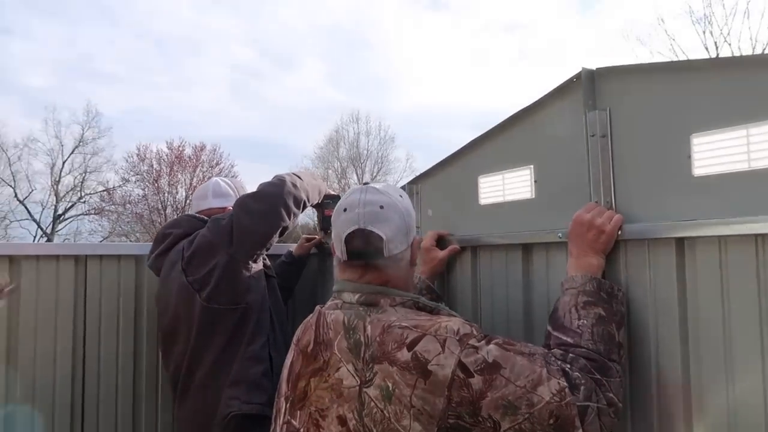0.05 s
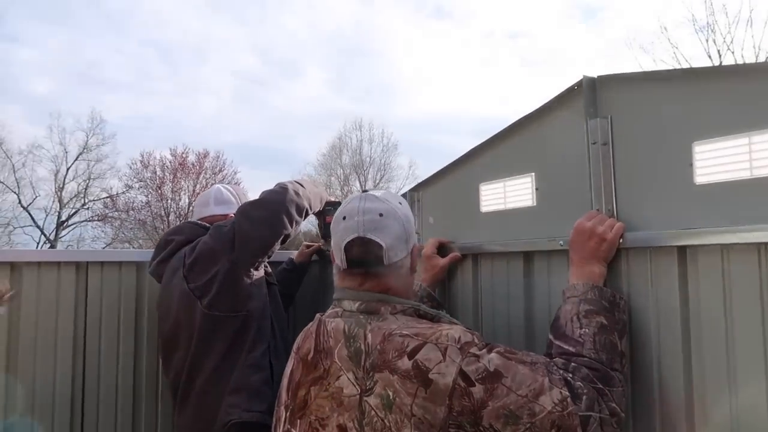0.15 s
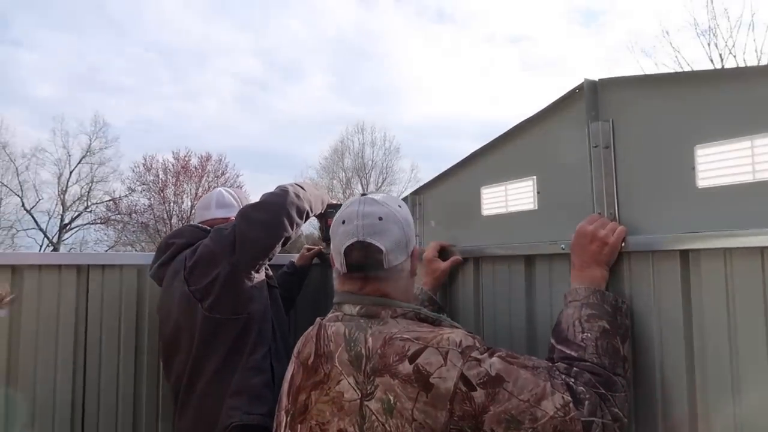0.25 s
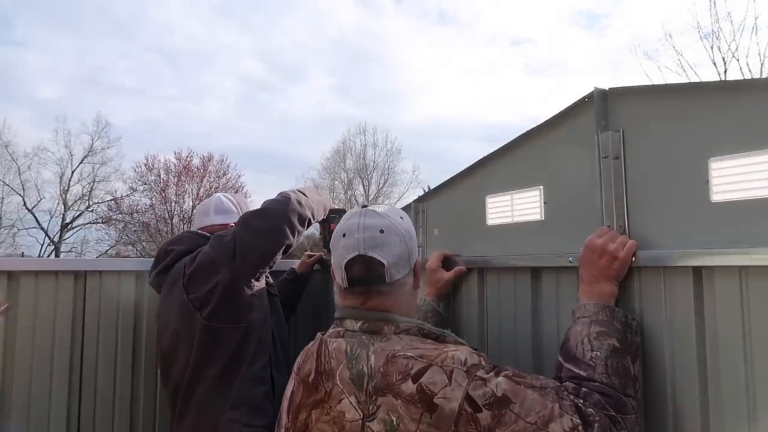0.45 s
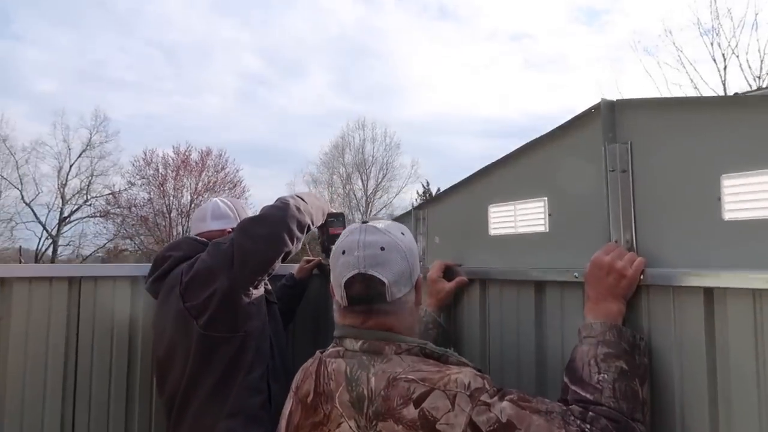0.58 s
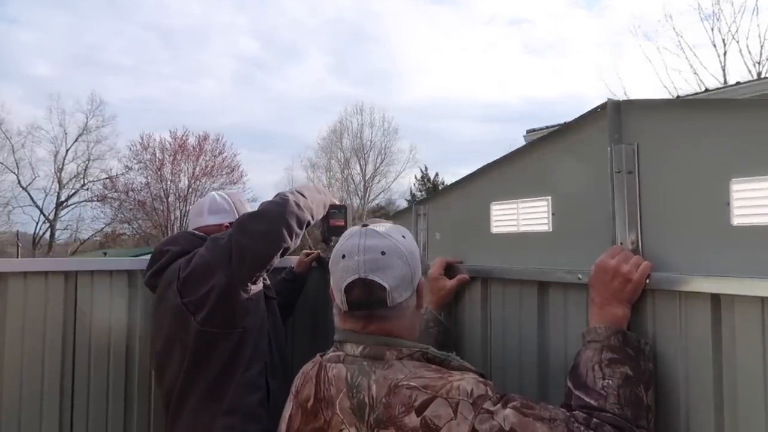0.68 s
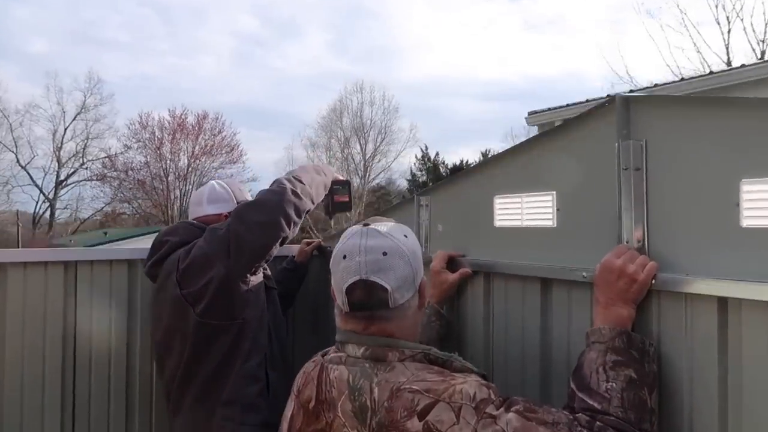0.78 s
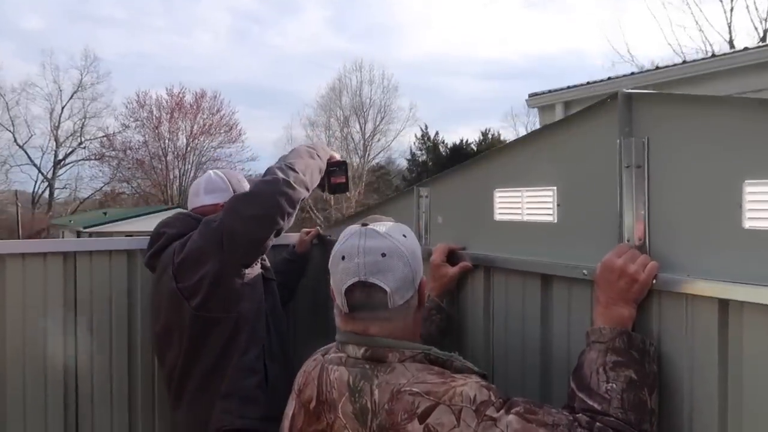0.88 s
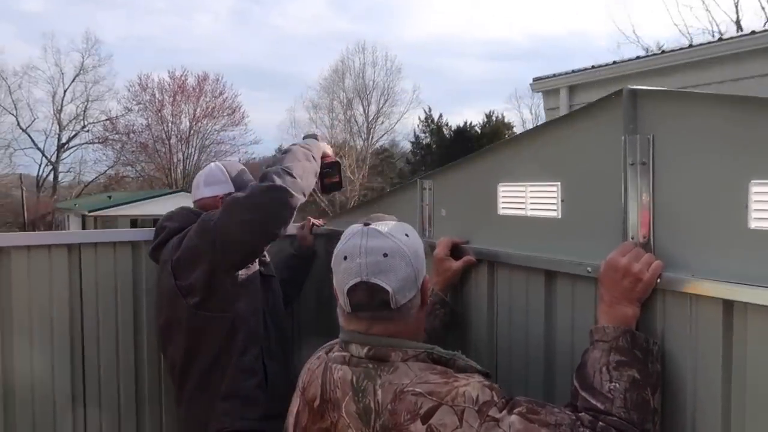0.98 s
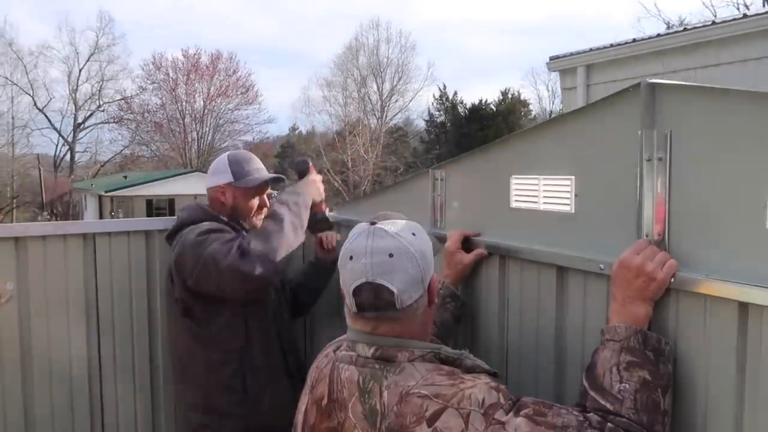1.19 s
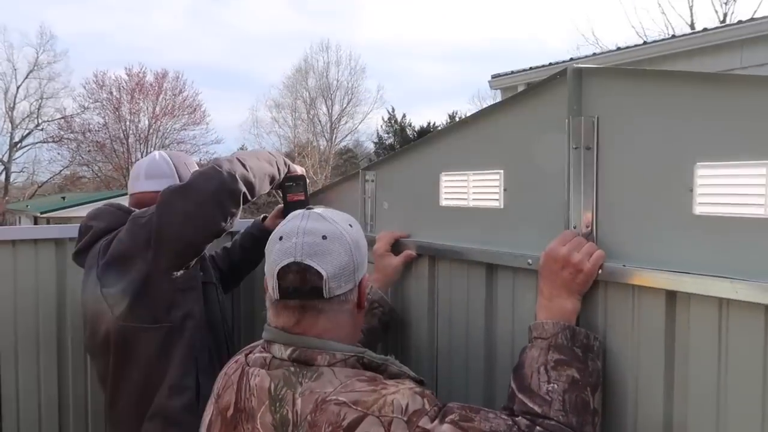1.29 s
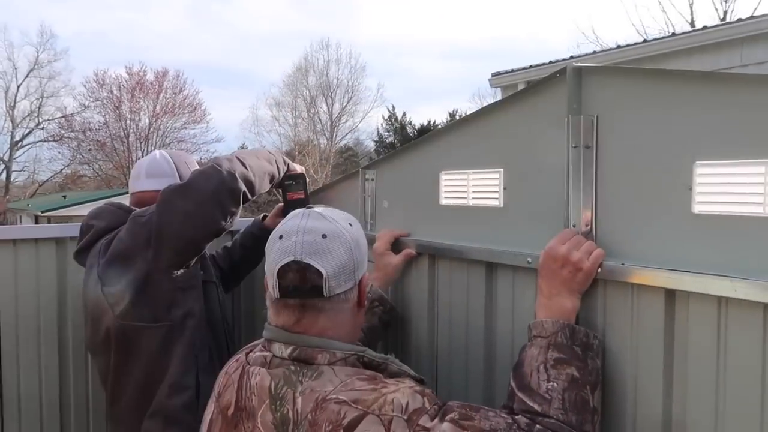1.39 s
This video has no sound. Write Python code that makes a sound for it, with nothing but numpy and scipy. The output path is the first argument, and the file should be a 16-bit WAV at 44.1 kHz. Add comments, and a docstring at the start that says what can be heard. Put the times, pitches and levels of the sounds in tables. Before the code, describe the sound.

A thin metal shed panel scrapes, then drops into place with a clattering, booming bang.

```python
"""A thin steel gable panel is shoved along a garden shed's wall, outdoors, an arm's length away.
Its edge scrapes and squeaks while the sheet bows and hums. At 0.3 s it drops into place with a
clattering bang; the walls boom on, loose overlaps chatter and a few light knocks follow.
Near the end the panel slides again with a thin hiss, and a gust brushes the microphone.
A steady low outdoor rumble with faint air lies underneath it all."""
import sys
import numpy as np
from scipy import signal
from scipy.io import wavfile

SR = 44100
rng = np.random.default_rng(int(sys.argv[2]) if len(sys.argv) > 2 else 0)


def log_audio(samples):
    """Write samples as a 16-bit WAV file to the path given in sys.argv[1]."""
    # one column per channel
    frames = np.atleast_2d(samples).T
    # limit to full scale, then quantise
    limited = np.clip(frames, -1, 1)
    pcm = np.round(limited * 32767).astype(np.int16)
    wavfile.write(sys.argv[1], SR, pcm)


N = 63945
TIME = np.arange(N) / SR

# the edge striking the wall: start_s, level_db, brightness_db_per_octave, cutoff_hz
BLOWS = [(.308, -8, 1.5, 14000), (0.3119, 1, 1.06, 12000), (0.316, 1.5, 0.5, 12000), (.322, 3, 0.74, 14000),
         (.329, -0.5, 1.7, 9000), (.342, 0, -0.7, 10000), (.353, -12.5, 4.14, 11000),
         (.359, -5, 1.5, 11000), (.367, -7.5, 2.5, 11000), (0.378, -18, 3.5, 9000),
         (.429, -16.5, 1.35, 8000), (0.441, -32, 5.5, 3500), (.49, -26, -2, 2500), (.531, -23.5, -2, 2500),
         (.702, -22.5, -3.5, 3200), (0.767, -31.5, -6.5, 340), (.852, -30, -1.5, 2300),
         (.93, -27, -0.5, 400)]
# colour of the sheet's dense modes: frequency_hz, density_db
SHEET_COLOUR = [(35, -36), (62, -10.5), (115, -15.5), (170, -8.5), (270, -6), (420, -1), (750, -6),
                (1100, -9.5), (1500, -9.5), (2400, -12.5), (3800, -15), (5000, -26), (7200, -17.5),
                (10000, -28.5), (15000, -30)]
# how long the sheet's tail rings: frequency_hz, t60_s
TAIL_DECAY = [(60, 1.3), (180, 2.12), (420, 1.185), (1000, 0.91), (2700, 0.5), (5000, 0.31), (12000, 0.11)]
# weight of that tail against the first crash: frequency_hz, level_db
TAIL_LEVEL = [(60, -3), (200, -1.5), (450, -9.5), (1100, -14.5), (3000, -14), (10000, -11.5)]


def bang():
    """Each blow cracks, crashes through the dense sheet modes and leaves the strong modes ringing."""
    # strong panel modes: pitch_hz, level_db, t60_s
    panel_modes = [(62.6, -13, 0.18), (114.8, -4, 0.67), (177.6, -14.5, 1.4), (230.6, -16, 1.6),
                   (236.4, -16, 1.16), (265.4, 4.5, 0.32), (290, -3, 0.25), (338.7, -0.5, 0.2),
                   (412.8, 2, 0.49), (550, -10, 0.18), (585.7, -5.5, 0.82), (732, -7.5, 0.13),
                   (1119, 4.5, 0.24), (1220, -14.5, 0.62), (1615, -12, 0.51), (2163, 0, 0.083),
                   (2284, -19.5, 0.39), (2930, -17.5, 0.27), (6652, -26.5, 0.12)]
    sheet_db, modes_db, crack_db = -17, -27, -22
    scatter_db, crack_hz, crack_decay_s = 3.5, 4900, 0.001
    times = np.transpose(BLOWS)[0]

    def crash_and_tail(hz):
        power = clicks(times, blow_sizes(hz) ** 2)
        crash = dying(power, t60=0.18 * (1000 / hz) ** 0.42)   # highs die first
        tail = from_db(at_hz(TAIL_LEVEL, hz)) ** 2 * dying(power, at_hz(TAIL_DECAY, hz))
        return np.sqrt(crash + tail)

    sheet = wash(SHEET_COLOUR, crash_and_tail)
    scatter = from_db(scatter_db * rng.standard_normal((len(times), len(panel_modes))))
    modes = sum(from_db(db) * pan(hz) * ring(clicks(times, blow_sizes(hz) * scatter[:, k]), hz, t60)
                for k, (hz, db, t60) in enumerate(panel_modes))
    crack_power = dying(clicks(times, blow_sizes(crack_hz) ** 2), crack_decay_s * np.log(1000))
    crack = soften(np.sqrt(crack_power) * rng.standard_normal(N), crack_hz)
    return from_db(sheet_db) * sheet + from_db(modes_db) * modes + from_db(crack_db) * crack


def wall_ring(count=90, low_hz=160.84, high_hz=3239):
    """The blows also ring the walls' many weaker modes, scattered evenly in pitch."""
    times, out = np.transpose(BLOWS)[0], 0
    pitches = low_hz * (high_hz / low_hz) ** ((np.arange(count) + rng.random(count)) / count)
    strengths = rng.standard_normal((len(times), count))
    for hz, strength in zip(pitches, strengths.T):
        gain = from_db(-38 + at_hz(SHEET_COLOUR, hz) + at_hz(TAIL_LEVEL, hz)) * np.sqrt(hz / low_hz)
        hits = clicks(times, blow_sizes(hz) * strength)
        out = out + gain * pan(hz) * ring(hits, hz, t60=0.79 * at_hz(TAIL_DECAY, hz))
    return out


def trim_clanks():
    """The stiff edge strip gives a short clank when struck."""
    # hits on the strip: start_s, level_db
    clanks = [(0.3111, -12), (.353, -17.5), (.362, -14.5), (.701, -32.5)]
    # its modes: pitch_hz, level_db, t60_s
    trim_modes = [(1088, -2.5, 0.068), (1167, -5, .07), (2437, -10.5, 0.064), (2830, -16.5, 0.077),
                  (3690, -12, 0.032)]
    times, db = np.transpose(clanks)
    hits = soften(clicks(times, from_db(db)) + 1e-18, cutoff_hz=3500)
    return sum(from_db(mode_db) * pan(hz) * ring(hits, hz, t60) for hz, mode_db, t60 in trim_modes)


def shove():
    """The edge grates over the wall while the sheet bows and booms."""
    # the scrape swells with the force of the shove: time_s, level_db
    force = [(0, -51.5), (.05, -55.5), (.09, -47.5), (.13, -38.5), (.152, -31), (.19, -33.5), (.23, -34.5),
             (.265, -31), (.285, -27.5), (.305, -22.5), (.33, -52), (.4, -100)]
    # the grating edge: frequency_hz, density_db
    scrape_colour = [(200, -2.5), (550, 3), (750, -2), (1050, 0.5), (1700, -5), (2500, -6.5), (4300, -13),
                     (5300, -19.5), (7500, -18.5), (11000, -36), (15000, -60)]
    # the sheet bowing: time_s, level_db
    flex = [(0, -53.5), (.11, -44), (.15, -40.5), (.205, -32), (.26, -26), (.3, -23.5), (.34, -33),
            (.5, -89)]
    # its boom: frequency_hz, density_db
    boom_colour = [(33, -22), (60, 13), (85, -11), (118, 14), (160, -15.5), (200, 1), (320, -0.5),
                   (550, -38), (1200, -42.5)]
    grating = level(force) * slips(per_s=900, spread_db=-0.5, t60=0.075)
    bowing = level(flex)
    return wash(scrape_colour, lambda hz: grating) + wash(boom_colour, lambda hz: bowing) + bowing * hum()


def hum(waver_hz=3.6):
    """Friction keeps the low panel modes humming, a little unsteady in pitch."""
    # modes of the bowing sheet, against its boom: pitch_hz, level_db
    bowed_modes = [(119, -4), (190, -10), (319, -10.5)]
    wavers, out = soften(rng.standard_normal((len(bowed_modes), N)), cutoff_hz=20), 0
    for (hz, db), waver in zip(bowed_modes, wavers):
        cycles = rng.random() + np.cumsum(hz + waver_hz * rms_one(waver)) / SR
        out = out + from_db(db) * rms_one(np.sin(2 * np.pi * cycles))
    return out


def squeaks(roughness=1.6, flutter_hz=92):
    """Short rough glides where metal sticks and slips on metal."""
    # stick-slip glides: start_s, end_s, from_hz, to_hz, level_db
    glides = [(0.043, 0.126, 4350, 4640, -56.5), (0.065, 0.129, 3830, 4600, -57),
              (0.144, 0.169, 820, 1600, -34.5), (.155, 0.196, 3050, 4000, -41.5),
              (0.193, 0.242, 2566, 2766, -41.5), (.18, 0.273, 1200, 1500, -42.5),
              (0.265, 0.299, 4550, 4250, -43.5), (0.276, 0.295, 3050, 2900, -33.5)]
    out = 0
    for start, end, from_hz, to_hz, db in glides:
        progress = np.clip((TIME - start) / (end - start), 0, 1)
        phase = 2 * np.pi * np.cumsum(from_hz + (to_hz - from_hz) * progress) / SR
        flutter = rms_one(soften(rng.standard_normal((2, N)), flutter_hz))
        rasp = flutter[0] * np.sin(phase) + flutter[1] * np.cos(phase)
        tone = rms_one(np.sin(phase) + roughness * rasp)
        swell = np.sqrt(np.abs(np.sin(np.pi * progress)))
        out = out + from_db(db) * swell * tone * pan(from_hz)
    return out


def slide():
    """A light, stuttering slide with a few catches, which sets the edge singing."""
    # the light push: time_s, level_db
    push = [(1.2, -120), (1.245, -63), (1.264, -45), (1.273, -42.5), (1.29, -50), (1.325, -45.5),
            (1.365, -48.5), (1.39, -42.5), (1.42, -51), (1.45, -52.5)]
    # thin hiss of steel on steel: frequency_hz, density_db
    hiss_colour = [(600, 9.5), (1400, -8), (2100, -8), (2900, -5), (3500, -9), (4300, -18), (5600, -2),
                   (7200, -12), (10000, 1), (12500, -30), (15000, -21)]
    catch_s, catch_db = (1.268, 1.295, 1.379), (-46, -49, -42)
    rubbing = level(push) * slips(per_s=900, spread_db=2.5, t60=.025)
    catch_power = dying(clicks(catch_s, from_db(catch_db) ** 2), t60=0.095)
    envelope = np.sqrt(rubbing ** 2 + catch_power)
    hiss = wash(hiss_colour, lambda hz: envelope, correlation_shift=-1)
    return hiss + envelope * np.array([edge_song(), edge_song()])


def edge_song():
    """Friction keeps the sliding edge's resonances sounding."""
    # resonances, against the hiss: pitch_hz, width_hz, level_db
    edge_rings = [(2800, 110, -14.5), (4070, 180, -9.5), (4670, 250, -11), (7060, 600, -10)]
    return sum(from_db(db) * rms_one(ring(rng.standard_normal(N), hz, np.log(1000) / (np.pi * width)))
               for hz, width, db in edge_rings)


def chatter():
    """Loose overlapping sheets buzz against each other while the walls ring."""
    # surges of the buzz: time_s, level_db
    surges = [(.36, -83), (.42, -29), (.48, -42), (.6, -48), (.68, -48), (.73, -44), (.82, -48.5),
              (.87, -48), (.95, -52), (1.08, -59), (1.14, -51.5), (1.22, -59.5), (1.45, -56.5)]
    # its colour: frequency_hz, density_db
    buzz_colour = [(250, -8), (550, 11.5), (900, -5), (1500, 2), (2000, -14), (2700, -4), (3600, -24),
                   (6000, -40), (12000, -66)]
    envelope = level(surges) * slips(per_s=230, spread_db=1.5, t60=0.12)
    return wash(buzz_colour, lambda hz: envelope)


def gust():
    """Light wind rumbles on the microphone."""
    # a puff at the start and one near the end: time_s, level_db
    puffs = [(0, -36), (.2, -60), (1.0, -65), (1.22, -52), (1.28, -32), (1.33, -63), (1.37, -57),
             (1.45, -62)]
    # the wind's bass: frequency_hz, density_db
    wind_colour = [(25, -6), (45, 2), (70, -6.5), (130, -22), (400, -67)]
    return wash(wind_colour, lambda hz: level(puffs))


def background():
    """A steady low outdoor rumble with faint air."""
    # rumble and air: frequency_hz, density_db
    bed_colour = [(25, -20), (50, -1.5), (100, 7), (230, -1.5), (450, -9.5), (700, -17), (1200, -25),
                  (3000, -32.5), (6000, -38), (12500, -48), (15000, -65)]
    # their slow drift: time_s, level_db
    drift = [(0, -45.5), (.6, -44), (1.08, -42), (1.13, -40.5), (1.23, -41.5), (1.29, -42), (1.39, -40.5),
             (1.45, -42.5)]
    return wash(bed_colour, lambda hz: level(drift))


def blow_sizes(hz):
    """Strength of each blow at one frequency: hard contacts are brighter, soft ones lose their top."""
    _, db, brightness, cutoff_hz = np.transpose(BLOWS)
    return from_db(db + brightness * np.log2(hz / 1000)) / np.sqrt(1 + (hz / cutoff_hz) ** 6)


def slips(per_s, spread_db, t60):
    """Grainy envelope of many tiny slips, each ringing briefly."""
    sizes = from_db(spread_db * np.minimum(rng.exponential(1, N), 4))
    slipping = rng.random(N) < per_s / SR
    return rms_one(np.sqrt(dying(slipping * sizes ** 2, t60)))


def wash(colour, envelope, correlation_shift=0):
    """Third-octave bands of stereo noise share unit power, then each is shaped by envelope(hz)."""
    # how alike left and right sound: frequency_hz, correlation
    stereo_image = [(100, .999), (300, 0.97), (700, 0.85), (1400, 0.76), (3100, 0.64), (6500, 0.17),
                    (9000, -0.7), (14000, 0.27)]
    edges_hz = 22 * 2 ** (np.arange(30) / 3)
    centres = np.sqrt(edges_hz[1:] * edges_hz[:-1])
    gains = from_db(at_hz(colour, centres)) * np.sqrt(centres)
    white, out = rng.standard_normal((2, 2, N)), 0
    for k, (hz, gain) in enumerate(zip(centres, gains / np.linalg.norm(gains))):
        band = signal.butter(2, edges_hz[k:k + 2], "band", fs=SR, output="sos")
        mid, side = rms_one(signal.sosfilt(band, white[k % 2]))
        alike = np.clip(at_hz(stereo_image, hz) + correlation_shift, -.9, 1)
        stereo = np.sqrt((1 + alike) / 2) * mid + np.sqrt((1 - alike) / 2) * side * [[1], [-1]]
        out = out + gain * build_up(envelope(hz), hz) * pan(hz) * stereo
    return out


def build_up(envelope, hz, rise_cycles=.5):
    """A band of modes needs a fraction of a cycle to respond."""
    r = np.exp(-hz / (rise_cycles * SR))
    return signal.lfilter([1 - r], [1, -r], envelope, zi=[r * envelope[0]])[0]


def ring(hits, hz, t60):
    """A unit click sets a sine of height 1 ringing."""
    r, w = from_db(-60 / (t60 * SR)), 2 * np.pi * hz / SR
    return signal.lfilter([0, np.sin(w)], [1, -2 * r * np.cos(w), r * r], hits + 1e-18)


def dying(power, t60):
    """Let every burst of power die away."""
    return signal.lfilter([1], [1, -from_db(-120 / (t60 * SR))], power + 1e-18)


def clicks(times, sizes):
    """A train of single-sample impulses."""
    return np.bincount((np.clip(times, 0, None) * SR).astype(int), sizes, N)[:N]


def soften(x, cutoff_hz):
    """A gentle low-pass."""
    return signal.sosfilt(signal.butter(2, cutoff_hz, fs=SR, output="sos"), x)


def pan(hz):
    """Left and right gains at one frequency."""
    # stereo balance: frequency_hz, left_minus_right_db
    balance = [(200, -0.5), (380, 1), (700, -4.5), (1300, -2.5), (2400, -1), (8000, 0.5)]
    return from_db(at_hz(balance, hz) * np.array([[.5], [-.5]]))


def at_hz(points, hz):
    """Read a table on a log-frequency axis."""
    f, value = np.transpose(points)
    return np.interp(np.log(hz), np.log(f), value)


def level(rows):
    """A fader curve through time_s, level_db points."""
    return from_db(np.interp(TIME, *np.transpose(rows)))


def rms_one(x):
    """Scale to unit rms."""
    return x / np.sqrt(np.mean(x ** 2) + 1e-20)


def from_db(db):
    """Decibels to gain."""
    return 10 ** (np.asarray(db) / 20)


def scene(left_lag_s=.000022):
    """The shed stands to the right, so its sound reaches the left side a little later."""
    left, right = bang() + wall_ring() + trim_clanks() + chatter() + shove() + squeaks() + background()
    late_left = np.interp(TIME - left_lag_s, TIME, left)
    return np.array([late_left, right]) + slide() + gust()


def record(dry, low_cut_hz=50, high_cut_hz=15500):
    """The deep bass is thinned and the top is cut."""
    thinned = signal.sosfilt(signal.butter(4, low_cut_hz, "high", fs=SR, output="sos"), dry)
    return signal.sosfilt(signal.ellip(10, .2, 80, high_cut_hz, fs=SR, output="sos"), thinned)


dry = scene()
out = record(dry)
log_audio(out)
```